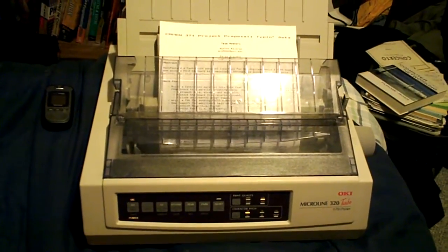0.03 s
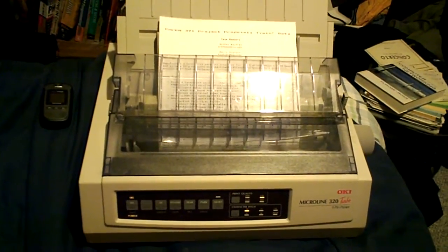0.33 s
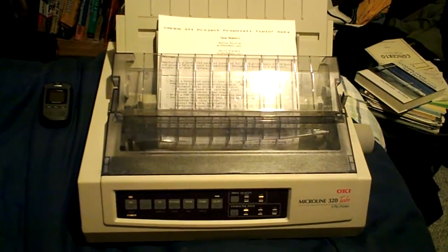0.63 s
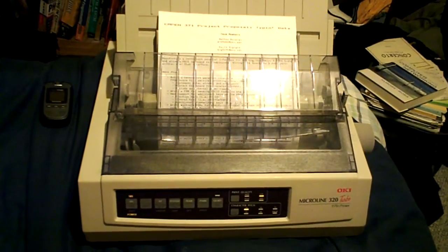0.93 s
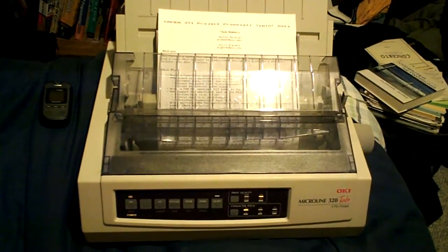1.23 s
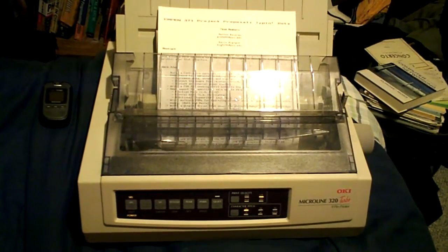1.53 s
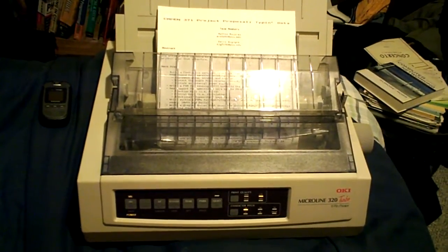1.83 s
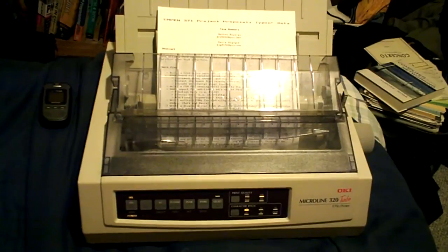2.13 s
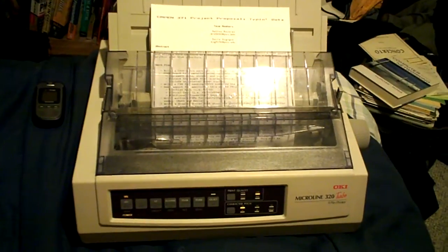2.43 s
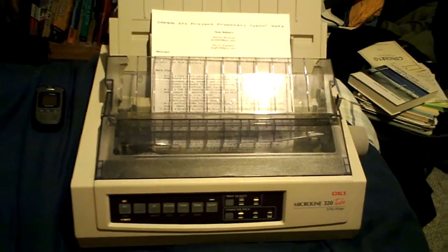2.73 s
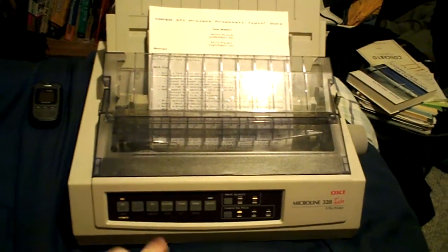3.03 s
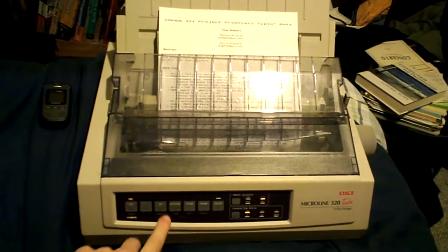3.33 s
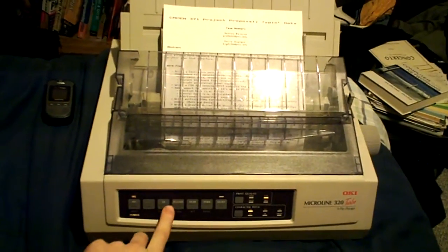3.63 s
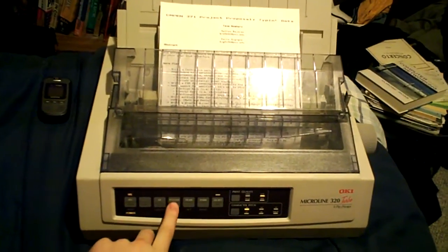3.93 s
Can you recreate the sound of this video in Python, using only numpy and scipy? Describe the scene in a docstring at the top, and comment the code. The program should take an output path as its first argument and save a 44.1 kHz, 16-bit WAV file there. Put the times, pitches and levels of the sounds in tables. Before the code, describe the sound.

A dot-matrix printer buzzes harshly from the start, printing four short lines of about a third of a second each. Its carriage whirrs along and knocks lightly as the paper steps on between lines. At about 1.4 seconds it stops with a brief rattle and a very faint metallic ring. The room stays quiet until about 2.7 seconds, when a nearby button gives one small, quick double click.

```python
"""Dot-matrix printer in a quiet room

Four short lines are printed. Pins strike the platen on a grid of dot columns, and the impacts excite
resonances of head and pins over the buzz of the plastic case. The carriage whirrs along; between lines
the paper steps on while the carriage knocks round. Later one small double click sounds close by."""
import sys
import numpy as np
from scipy import signal
from scipy.fft import rfft, irfft
from scipy.io import wavfile
from scipy.ndimage import uniform_filter1d

SR = 44100
rng = np.random.default_rng(int(sys.argv[2]) if len(sys.argv) > 2 else 0)


def dump_mix(stems):
    """Bounce the given channels to the path in sys.argv[1] as a 16-bit WAV at rate SR."""
    frames = np.atleast_2d(stems).T  # one column per channel
    limited = np.clip(frames, -1, 1)  # hard clip at full scale
    pcm = np.round(limited * 32767).astype(np.int16)
    wavfile.write(sys.argv[1], SR, pcm)


N = 176400
T = np.arange(N) / SR
CHARACTERS_PER_S = 272.4
# pin force along each printed line, first dot to last: t/s, level/dB
PRINT_LINES = [
    [(0.029, -38.5), (0.055, -40.5), (0.12, -40), (0.19, -37.5), (0.26, -40), (0.318, -39)],
    [(0.403, -41), (0.43, -42), (0.468, -38.5), (0.56, -41), (0.61, -39.5), (0.678, -42.5)],
    [(0.75, -38.5), (0.87, -39.5), (0.895, -37.5), (0.95, -37.5), (1.012, -39.5)],
    [(1.127, -35.5), (1.16, -38.5), (1.22, -40), (1.26, -40.5), (1.345, -42)],
]


def pin_strikes(jitter_s=.00008, space_share=.12, column_spread_db=3, letter_spread_db=1):
    """A quasi-periodic impulse train: each inked dot column is one impact, and spaces leave gaps."""
    # probability of ink in each column of a character cell; the last lie between letters
    ink_chance = [0.72, 0.34, 0.46, 0.51, 0.81, .45, 0.7, 0.41, .7, 0.21, 0.2, 0.17]
    columns, letters = len(ink_chance), int(N / SR * CHARACTERS_PER_S)
    shape = (letters, columns)
    inked = (rng.random(shape) < ink_chance) * (rng.random((letters, 1)) > space_share)
    column_db = column_spread_db * rng.standard_normal(shape)
    letter_db = letter_spread_db * rng.standard_normal((letters, 1))
    force = (inked * from_db(column_db - letter_db)).ravel()
    times = np.arange(force.size) / (columns * CHARACTERS_PER_S)
    times += jitter_s * rng.standard_normal(force.size)
    return reflected(evened(impulses(times, force)) * sum(envelope(line) for line in PRINT_LINES))


def print_head(low_cut_hz=1030, waver_db=6):
    """Impact excitation: each pin strike gives a broadband crack and rings the modes of head and pins."""
    # spectrum of a strike: f/Hz, relative level/dB
    strike_spectrum = [(1000, -6), (1600, 2), (2200, -0.5), (2650, -8), (3200, -6), (3800, 0.5),
                       (4450, -7.5), (5100, 1), (6700, 3.5), (7400, 1.5), (8300, -4.5), (9150, -3),
                       (9700, -14.5), (10400, -15), (11200, -11.5), (12200, -14), (14000, -22),
                       (15700, -35)]
    # modes of the head and of the pins: f/Hz, relative level/dB, T60/s
    head_modes = [(2244, -29.5, 0.06), (3220, -28, .012), (3780, -40, .02), (5120, -27, 0.048),
                  (6620, -23, 0.015)]
    pin_modes = [(8890, -14, 0.038), (9100, -10.5, 0.018), (9190, -9.5, 0.042)]
    # envelopes of the pin modes and of a whine near the dot-column rate: t/s, relative level/dB
    pin_levels = [(0, -3.5), (.19, -2.5), (.32, 0), (.45, -3), (.68, -2), (.79, -6.5), (.9, 1), (1.0, 0),
                  (1.13, 0.5), (1.26, -1), (1.34, -0.5), (1.45, -18)]
    whine_levels = [(0, -18), (.24, -15.5), (.29, -5.5), (.33, -20), (.45, -13), (.52, -27), (.6, -11),
                    (.7, -22.5), (1.15, -20), (1.25, -15), (1.45, -23)]
    strikes = pin_strikes()
    crack = from_db(-1.5) * coloured(strikes, strike_spectrum)
    head = sum(from_db(db + waver_db * drift(11.5)) * unit_rms(ring(strikes, hz, t60))
               for hz, db, t60 in head_modes)
    pins = sum(from_db(db) * unit_rms(ring(strikes, hz, t60)) for hz, db, t60 in pin_modes)
    whine = envelope(whine_levels) * unit_rms(ring(strikes, hz=3268, t60=0.054))
    ringing = strikes.std() * (head + envelope(pin_levels) * pins + whine)
    return filtered(crack + ringing, low_cut_hz, "high")


def line_change(steps_per_s=455, jitter_s=.0004, spread_db=3, ramp_s=0.0027, knock_s=0.005):
    """Structure-borne sound: paper-feed steps and the knocks of the turning carriage shake the frame."""
    # paper feeds: start t/s, duration/s, level/dB
    feeds = [(-0.03, 0.076, -45), (0.316, 0.077, -42), (0.667, 0.094, -43), (1.009, 0.072, -41.5),
             (1.087, 0.038, -48.5), (1.332, 0.054, -42.5), (1.395, 0.015, -42.5)]
    # carriage knocks: t/s, level/dB
    knocks = [(0.345, -43), (0.352, -38.5), (0.69, -43.5), (0.712, -39.5), (0.736, -45.5), (1.042, -51),
              (1.349, -45), (1.376, -40.5)]
    # response of the frame: f/Hz, relative level/dB
    frame_spectrum = [(30, -40), (80, -34), (170, -6), (260, -2.5), (380, 6.5), (560, -0.5), (930, 7),
                      (1250, 0.5), (1650, 1.5), (2100, -1), (3000, -8), (5200, -12), (7200, -20),
                      (8300, -42), (10200, -38), (15000, -48)]
    # chassis modes, rung by the knocks: f/Hz, relative level/dB, T60/s
    chassis_modes = [(175, -22.5, 0.096), (246, -16, 0.13)]
    step_times = np.arange(2000) / steps_per_s
    timing, strength = rng.standard_normal((len(step_times), 2)).T
    steps = unit_rms(impulses(step_times + jitter_s * timing, from_db(spread_db * strength)))
    drive = sum(from_db(db) * np.clip(np.minimum(T - start, start + length - T) / ramp_s, 0, 1)
                for start, length, db in feeds)
    knock_times, knock_db = np.transpose(knocks)
    blows = impulses(knock_times, from_db(knock_db) * np.sqrt(knock_s * SR))  # energy of knock_s at once
    return coloured(reflected(steps * drive + blows), frame_spectrum) + struck(knocks, chassis_modes)


def carriage(rattles_per_s=2500):
    """Shot noise: fine contacts along the rack merge into a whirr, with a light rattle through turns."""
    # spectrum of the sliding carriage: f/Hz, relative level/dB
    slide_spectrum = [(30, -18), (120, -18.5), (165, -15.5), (205, -9.5), (235, -3), (270, -7.5),
                      (305, -8.5), (360, 5), (390, 5), (440, -4), (520, -4.5), (600, -7), (675, 5.5),
                      (750, -4), (920, 7.5), (1080, -3), (1220, -4.5), (1400, -2.5), (1620, 6), (1800, 1),
                      (2000, -13), (2600, -5.5), (6000, -13.5), (12000, -40)]
    # light rattle: t/s, level/dB
    rattle_levels = [(0, -56.5), (.37, -58), (.72, -67), (1.05, -59), (1.11, -57.5),
                     (1.37, -67), (1.43, -75)]
    whirr = coloured(reflected(unit_rms(contacts(rattles_per_s)), spots=4), slide_spectrum)
    running = from_db(-47.5) * unit_rms(whirr) * printing(lag_s=.015)
    return running + friction(rattle_levels, band_hz=(2560, 6940), per_s=6400)


def case_buzz(motor_hz=478, motor_db=-61, waver_db=2.5, wander_rad=.5):
    """Forced vibration: the case hums at harmonics of the character rate, beside the motor's tone."""
    # hum of the case: harmonic number, level/dB
    harmonics = [(1, -62.5), (2, -67), (3, -64.5), (4, -62), (5, -58), (6, -74)]
    tones = [(k * CHARACTERS_PER_S, db) for k, db in harmonics] + [(motor_hz, motor_db)]
    hum = 0
    for hz, db in tones:
        amplitude = np.sqrt(2) * from_db(db + waver_db * drift(25))
        phase = 2 * np.pi * (hz * T + rng.random()) + wander_rad * drift(9.9)
        hum += amplitude * np.sin(phase)
    return printing(lag_s=0.02) * hum


def coming_to_rest():
    """Free decay: the cover chatters out and a lightly damped metal part rings on."""
    chatter_levels = [(1.385, -70), (1.405, -55), (1.425, -58), (1.46, -68.5)]  # t/s, level/dB
    # mode of the metal part: t/s, f/Hz, level/dB, T60/s
    metal_mode = (1.38, 1249, -69, 1.5)
    start, hz, db, t60 = metal_mode
    chatter = friction(chatter_levels, band_hz=(1510, 4200), per_s=2500)
    return chatter + ring(impulses([start], [from_db(db)]), hz, t60)


def small_click():
    """Heavily damped impacts: a dull thud, a brief scrape, and a sharp snap."""
    # impacts of the thud and of the snap: t/s, level/dB
    thuds = [(2.7032, -30), (2.7069, -42)]
    snaps = [(2.7182, -46), (2.7189, -38.5)]
    # the modes each excites: f/Hz, relative level/dB, T60/s
    thud_modes = [(290, -30, 0.0065), (556, -3.5, 0.0056), (760, -8, 0.01), (2180, -4, 0.0012),
                  (6200, -25, 0.0022)]
    snap_modes = [(1560, -14, 0.0096), (1850, 5, 0.0078), (3850, 0, 0.011), (6000, -4, 0.0038),
                  (7200, -15, 0.0042)]
    # scrape between thud and snap: t/s, level/dB
    scrape_levels = [(2.704, -66), (2.712, -65), (2.717, -56), (2.7187, -55), (2.72, -62)]
    scrape = friction(scrape_levels, band_hz=(3480, 7300), per_s=26000)
    return filtered(struck(thuds, thud_modes) + scrape + struck(snaps, snap_modes), 255, "high")


def reflected(x, spots=6):
    """Diffuse reverberation: each contact sounds from one of several spots, each with its own response."""
    # reflections in the case, under the cover and in the room: level/dB re direct sound, T60/s
    reflections = [(-1.5, 0.03), (3, 0.14), (-7.5, 0.34)]
    spot, t, out = rng.integers(0, spots, N), T[:SR // 2], 0
    power = sum(from_db(db - 60 * t / t60) ** 2 * 2 * np.log(1000) / (t60 * SR) for db, t60 in reflections)
    for k in range(spots):
        response = (t == 0) + np.sqrt(power) * rng.standard_normal(len(t))
        out += signal.fftconvolve(x * (spot == k), response / np.linalg.norm(response))[:N]
    return out


def room_air():
    """Stationary random noise forms the faint background of the room."""
    # spectrum of the air: f/Hz, relative level/dB
    air_spectrum = [(12, -59.5), (20, -20.5), (58, -24.5), (81, -32.5), (109, -17), (492, -0.5),
                    (535, -3.5), (790, -3), (884, -4.5), (1200, -4.5), (1500, -6), (1630, -6.5),
                    (4570, -12.5), (8670, -20.5), (15600, -27)]
    return from_db(-69.5) * coloured(rng.standard_normal(N), air_spectrum)


def struck(hits, modes):
    """Modal superposition: the responses of all modes to the hits add up."""
    times, hit_db = np.transpose(hits)
    force = impulses(times, from_db(hit_db))
    return sum(from_db(db) * ring(force, hz, t60) for hz, db, t60 in modes)


def ring(x, hz, t60):
    """A damped oscillator: a unit impulse starts a unit sine that falls 60 dB in t60 seconds."""
    r, w = from_db(-60 / (t60 * SR)), 2 * np.pi * hz / SR
    return signal.lfilter([0, np.sin(w)], [1, -2 * r * np.cos(w), r * r], x + 1e-18)


def friction(levels, band_hz, per_s):
    """Band-limited shot noise from dense little contacts."""
    return envelope(levels) * unit_rms(filtered(contacts(per_s) + 1e-18, band_hz, "band"))


def contacts(per_s):
    """A Poisson process of impulses with Gaussian strengths."""
    return (rng.random(N) < per_s / SR) * rng.standard_normal(N)


def impulses(times, gains):
    """Ideal impacts, one sample each."""
    at = np.round(np.asarray(times) * SR).astype(int)
    inside = (at >= 0) & (at < N)
    return np.bincount(at[inside], np.asarray(gains)[inside], N)


def printing(lag_s):
    """First-order lag towards 1 during a printed line and 0 otherwise."""
    on = sum(envelope(line) for line in PRINT_LINES) > 0
    r = np.exp(-1 / (lag_s * SR))
    return signal.lfilter([1 - r], [1, -r], on)


def envelope(rows):
    """Gain interpolated from rows of t/s, level/dB; zero outside them."""
    times, db = np.transpose(rows)
    return from_db(np.interp(T, times, db)) * (T >= times[0]) * (T <= times[-1])


def evened(x, window_s=0.039):
    """Division by the running rms steadies the power and leaves the fast roughness."""
    return x / np.sqrt(np.abs(uniform_filter1d(x ** 2, int(window_s * SR))) + 1e-3)


def coloured(x, spectrum, size=4096):
    """Minimum-phase filter of the given spectral shape; conserves the power of white input."""
    hz, db = np.transpose(spectrum)
    bins = np.maximum(np.arange(size // 2 + 1) * SR / size, 1)
    magnitude = from_db(np.interp(np.log(bins), np.log(hz), db))
    cepstrum = irfft(np.log(magnitude))
    response = irfft(np.exp(rfft(2 * cepstrum[:size // 2], size)))
    return signal.fftconvolve(x, response / np.linalg.norm(response))[:N]


def drift(hz):
    """Slow random fluctuation: low-passed noise of rms 1."""
    return unit_rms(filtered(rng.standard_normal(N + SR), hz, "low")[SR:])


def filtered(x, hz, kind):
    """Second-order Butterworth filter."""
    return signal.sosfilt(signal.butter(2, hz, kind, fs=SR, output="sos"), x)


def unit_rms(x):
    """Normalisation to rms 1."""
    return x / np.sqrt(np.mean(x ** 2) + 1e-20)


def from_db(db):
    """Level to amplitude ratio."""
    return 10 ** (np.asarray(db) / 20)


def scene():
    """Superposition of printer, click and room air, in mono."""
    printer = print_head() + case_buzz() + carriage() + line_change() + coming_to_rest()
    return (printer + small_click() + room_air())[None]


def record(dry):
    """Band limiting: an elliptic low-pass cuts steeply above 15750 Hz."""
    return signal.sosfilt(signal.ellip(12, .1, 80, 15750, fs=SR, output="sos"), dry)


dry = scene()
out = record(dry)
dump_mix(out)
```